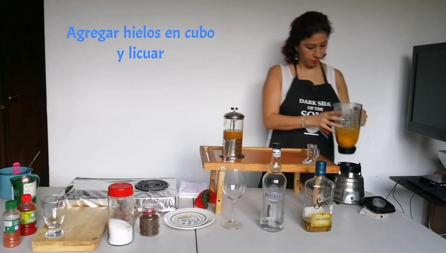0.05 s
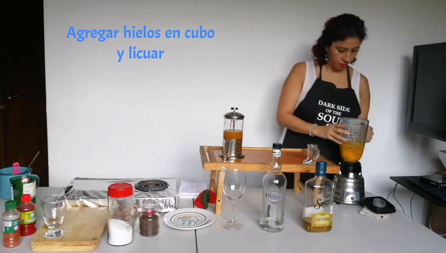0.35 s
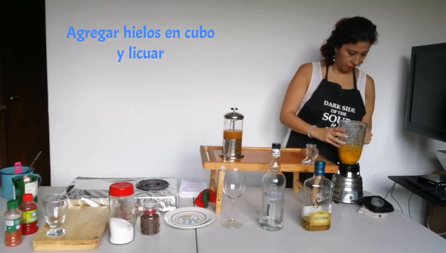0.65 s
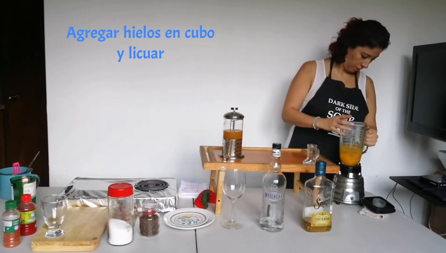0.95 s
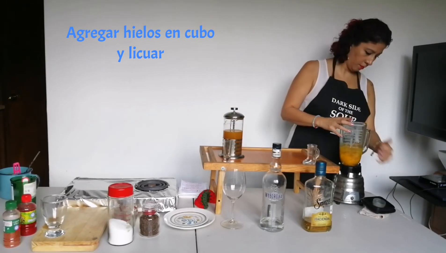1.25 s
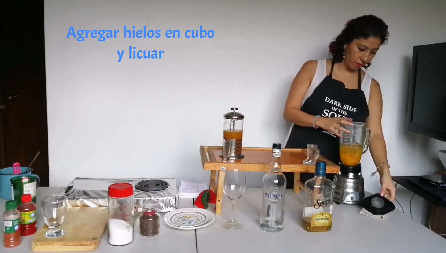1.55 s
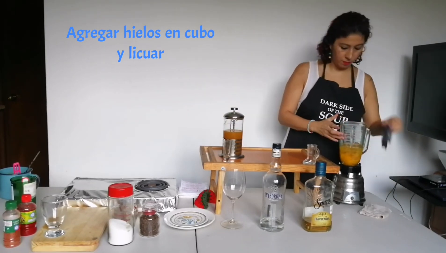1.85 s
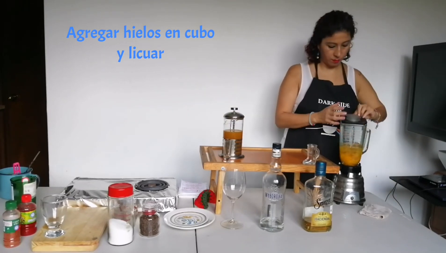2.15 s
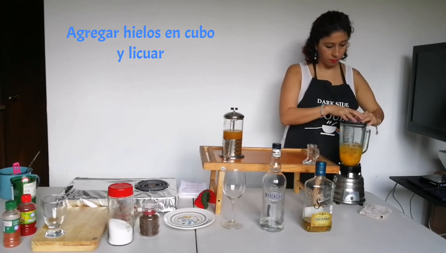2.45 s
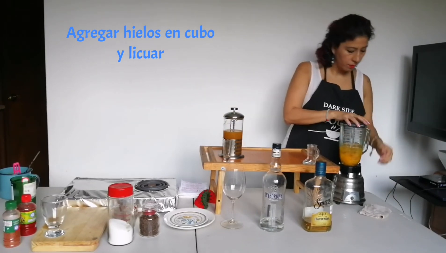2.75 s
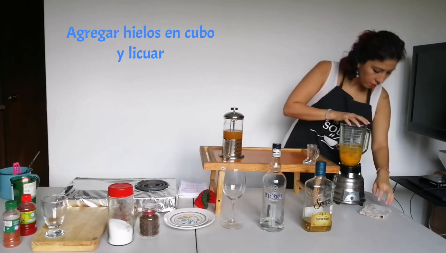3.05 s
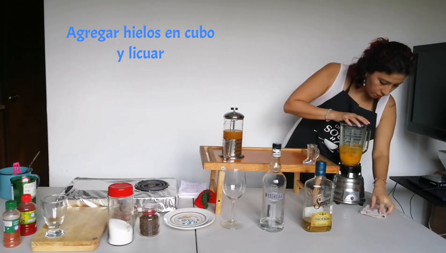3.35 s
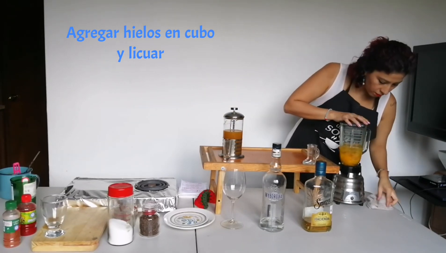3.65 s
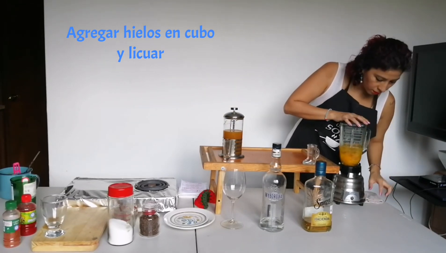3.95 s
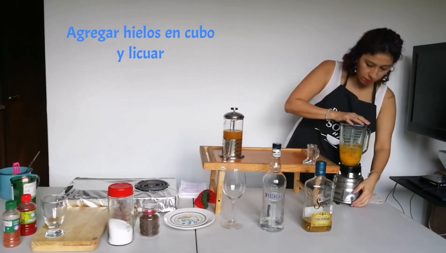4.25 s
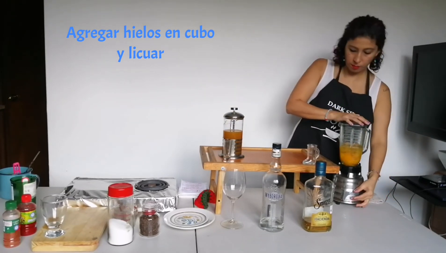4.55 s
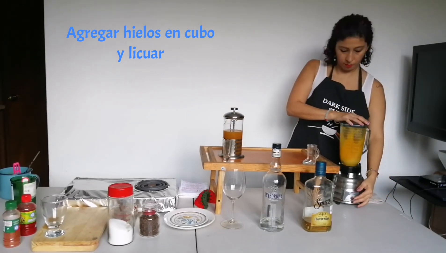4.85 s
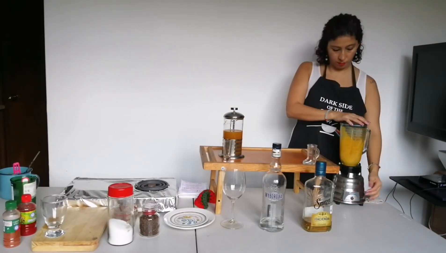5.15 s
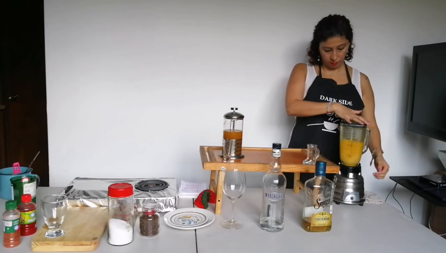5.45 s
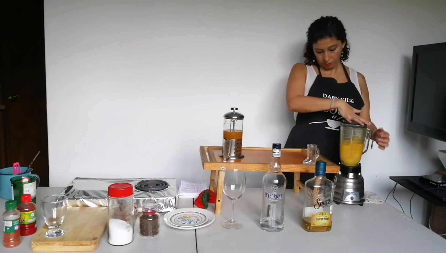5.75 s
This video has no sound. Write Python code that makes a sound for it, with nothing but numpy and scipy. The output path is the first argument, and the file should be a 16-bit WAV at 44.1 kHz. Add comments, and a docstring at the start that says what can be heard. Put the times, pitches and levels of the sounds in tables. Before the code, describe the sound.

In a small room with hard walls, a blender jar knocks onto its base and grinds twice as it is twisted home. A rubber lid is pressed on with quick thuds and a pop. A hand softly bumps the table and grips the base. The switch snaps, and the motor spins up, humming and whining while ice churns and rattles against the jar. The stereo sound has a short echo and a faint background hiss.

```python
"""You hear a blender jar of juice and ice knock and grind onto its base in a small hard-walled room.
Its rubber lid is pressed on, a hand bumps the table and grips the base, and the switch snaps.
The motor spins up, humming and whining, while the blades churn the ice and fling it at the jar.
Each knock is a thud of ringing tones plus a short scrape of noise. Before the motor starts,
faint rustles and a low drone swell and fade over a soft hiss and rumble."""
import sys
import numpy as np
from scipy import signal
from scipy.fft import rfft, irfft, next_fast_len
from scipy.io import wavfile
from scipy.ndimage import map_coordinates

SR = 44100
rng = np.random.default_rng(int(sys.argv[2]) if len(sys.argv) > 2 else 0)


def materialize(psi):
    """Save the field psi as 16-bit PCM at rate SR to the path in sys.argv[1].

    A 1-D psi becomes a single channel; in a 2-D psi each row is a channel.
    """
    bounded = np.clip(np.atleast_2d(psi).T, -1, 1)
    quanta = np.round(bounded * 32767).astype(np.int16)
    wavfile.write(sys.argv[1], SR, quanta)


N = 265103
TOP_HZ = 11750  # the highest pitch let through
MOTOR_ON_S, LOADED_HZ = 4.722, 243  # switch-on time; shaft turns a second against the ice

# The jar is twisted home. Each row: start in seconds, thud in dB, scrape in dB.
JAR_TWISTS = [(.65, -30, -34.5), (1.088, -34.5, -33)]
# Tones of the housing. Each row: pitch in Hz, level in dB, seconds to fade by 60 dB.
HOUSING_MODES = [(332, -11, 0.31), (395.4, -3.5, 0.15), (463, 5.5, 0.11), (555, 1, 0.075),
                 (659, -1.5, 0.12), (928, -12, 0.23)]
# Tone colour of blades in ice. Each row: frequency in Hz, noise level in dB.
CHURN_COLOUR = [(350, -33), (600, -11.5), (809, -6), (1000, -12.5), (1210, -5), (1490, -9), (1840, -6),
                (2330, -6), (2960, -4.5), (3400, -7), (3700, -12), (4300, -10.5), (5200, -1.5), (6100, 2),
                (7820, -13), (9910, -14.5), (10700, -20.5), (11800, -43)]
# Where the jar and metal shell ring. Each row: pitch in Hz, width in Hz, level in dB.
CASING_RESONANCES = [(1220, 30, -9), (1350, 30, -11), (1895, 40, -11), (2223, 60, -7), (2480, 50, -8),
                     (2724, 40, -9), (2950, 130, 1), (3240, 60, -8), (5432, 40, -3), (5865, 50, -2),
                     (6150, 50, 1), (6422, 35, 0)]


def amp(db):
    """Turn decibels into a gain."""
    return 10 ** (np.asarray(db) / 20)


def unit(x):
    """Scale a signal to an average power of 1."""
    return x / np.sqrt(np.mean(x ** 2) + 1e-20)


def along(points, hz):
    """Read between (Hz, value) points on a logarithmic frequency axis."""
    freqs, values = np.transpose(points)
    return np.interp(np.log(hz + 1), np.log(freqs + 1), values)


def curve(points):
    """Join (seconds, value) points into one value per sample."""
    return np.interp(np.arange(N) / SR, *np.transpose(points))


def since(s):
    """Seconds gone by since s, zero before it."""
    return np.maximum(np.arange(N) / SR - s, 0)


def ramp(s, rise_s):
    """Rise from 0 at time s to 1 over rise_s seconds."""
    return np.minimum(since(s) / rise_s, 1)


def wobble(rate, size=N):
    """A smooth curve through rate random values a second."""
    values = rng.standard_normal(int(size * rate / SR) + 4)
    return map_coordinates(values, [np.arange(size) * rate / SR])


def filtered(x, response):
    """Scale each frequency in x by response(hz)."""
    n = x.shape[-1]
    padded = next_fast_len(n + SR // 4)
    return irfft(rfft(x, padded) * response(np.fft.rfftfreq(padded, 1 / SR)), padded)[..., :n]


def resonances(table, hz):
    """How strongly a ringing body answers each frequency."""
    return sum(amp(db) * 1j * hz * width / (pitch ** 2 - hz ** 2 + 1j * hz * width)
               for pitch, width, db in table)


def spread(pair):
    """Mix two unrelated signals into sound from all around: the ears match only in the bass."""
    # Each row: frequency in Hz, likeness of left and right from 0 to 1.
    likeness = [(60, 0.9), (300, 0.92), (550, 0.61), (1000, 0), (4000, 0)]
    turn = lambda hz: np.arccos(np.clip(along(likeness, hz), -1, 1)) / 2
    mid, side = filtered(pair, lambda hz: np.array([np.cos(turn(hz)), np.sin(turn(hz))]))
    return np.array([mid + side, mid - side])


def noise(colour):
    """Stereo noise with the given tone colour and a power of 1."""
    return unit(filtered(spread(rng.standard_normal((2, N))), lambda hz: amp(along(colour, hz))))


def room(x, wet_db):
    """Hard walls add an echo at wet_db, in which each frequency dies at its own speed."""
    # Each row: frequency in Hz, seconds to fade by 60 dB.
    fade_times = [(150, 0.34), (400, 0.4), (1000, 0.37), (2800, 0.4), (7000, 0.28), (11000, 0.29)]
    hz, t, spectrum = signal.stft(rng.standard_normal((2, SR // 2)), SR, nperseg=256)
    fade = amp(-60 * t / along(fade_times, hz)[:, None])
    tail = spread(signal.istft(spectrum * fade, SR, nperseg=256)[1])
    tail = filtered(tail, lambda hz: hz < TOP_HZ)
    tail *= np.sqrt(2 * TOP_HZ / SR) / np.linalg.norm(tail[0])
    x = np.atleast_2d(x)
    return x + amp(wet_db) * signal.fftconvolve(x, tail, axes=1)[:, :x.shape[1]]


def contacts(rows, modes, colour, swell_s, sizzle_db, grain_db, wet_db, thud_wet_db, hard=(), hard_db=0):
    """Each knock thuds in a body's own tones (modes) and scrapes in tiny slips that ring hard parts."""
    size = SR * 3 // 4
    out, t = np.zeros((2, N + size)), np.arange(size) / SR
    sizzle = [(6800, 0), (8500, sizzle_db)]  # lifts or cuts the top treble
    swell = t / swell_s * np.exp(1 - t / swell_s)
    for start, thud_db, scrape_db in rows:
        ring = sum((-1) ** k * amp(db + rng.normal(0, 1) - 60 * t / fade_s)
                   * np.sin(2 * np.pi * hz * rng.normal(1, 0.0064) * t)
                   for k, (hz, db, fade_s) in enumerate(modes))
        thud = amp(thud_db) * ring * (1 - np.exp(-t / .0014)) / 2
        slips = spread(rng.standard_normal((2, size))) * amp(grain_db * wobble(705, size))
        slips = unit(filtered(slips, lambda hz: amp(along(colour, hz) + along(sizzle, hz))))
        scrape = amp(scrape_db) * slips * swell
        scrape = filtered(scrape, lambda hz: 1 + amp(hard_db) * resonances(hard, hz))
        out[:, round(start * SR):][:, :size] += room(thud, thud_wet_db) + room(scrape, wet_db)
    return out[:, :N]


def room_air():
    """The air hisses softly over a rumble that falls away once the motor runs."""
    # Each row: frequency in Hz, noise level in dB.
    air_colour = [(53, -40), (95, -16), (125, -17), (250, -10), (480, -16), (1200, -26), (3300, -30.5),
                  (3800, -38.5), (4500, -37), (5300, -31), (6400, -31), (7500, -39), (10500, -41),
                  (11700, -50)]
    rumble_colour = [(10, 1), (30, 4.5), (42, 1.5), (62, -2.5), (90, -5), (160, -18.5), (500, -131)]
    rumble = amp(-55.5 - 20.5 * ramp(MOTOR_ON_S, rise_s=0.26)) * noise(rumble_colour)
    return amp(-61) * noise(air_colour) + rumble


def drone():
    """A low tone glides upward in three swells."""
    # Each row: time in seconds, level in dB.
    swells = [(3.4, -70), (3.58, -58.5), (3.76, -51), (3.96, -59), (4.05, -49.5), (4.17, -56.5),
              (4.33, -48.5), (4.7, -58.5), (4.8, -100)]
    pitch_hz = 85 + 13.3 * since(swells[0][0])
    return np.sqrt(2) * amp(curve(swells)) * np.sin(2 * np.pi * np.cumsum(pitch_hz) / SR)


def rustle():
    """A soft, crinkly rustle swells with each reach of the arm."""
    # Each row: middle in seconds, length in seconds, level in dB.
    reaches = [(.42, .3, -66.5), (2.985, 0.39, -66.5), (3.907, 1.4, -66.5)]
    # Each row: frequency in Hz, noise level in dB.
    colour = [(200, -7), (700, 3), (1500, -1), (3200, -7.5), (4000, -10.5), (5800, -5.5), (8000, -20),
              (11500, -28)]
    t = np.arange(N) / SR
    level = sum(amp(db) * np.cos(np.pi * np.clip((t - middle) / length, -.5, .5))
                for middle, length, db in reaches)
    return level * unit(noise(colour) * amp(2.1 * wobble(18) + 2.3 * wobble(400)))


def faint_clicks():
    """Things click as they are picked up and put down."""
    # Each row: start in seconds, thud in dB, scrape in dB.
    clicks = [(1.569, -68, -72), (1.72, -66, -71), (1.92, -70, -70), (2.16, -65, -66), (3.436, -60, -58)]
    # Each row: frequency in Hz, scrape level in dB.
    colour = [(300, -16), (1500, -15), (2800, -13), (3400, 3), (4100, -12), (5800, -2), (11000, -26)]
    return contacts(clicks, HOUSING_MODES, colour, swell_s=.003,
                    sizzle_db=-3, grain_db=3, wet_db=2, thud_wet_db=0)


def table_shake():
    """The table gives a deep shudder after each twist of the jar."""
    # Each row: frequency in Hz, noise level in dB.
    colour = [(15, -8), (35, -1), (62, 12.5), (80, 4.5), (112, 4), (170, -33), (500, -100)]
    rise_s, fall_db_per_s = 0.029, 71
    level = sum(ramp(s, rise_s) * amp(-fall_db_per_s * since(s + rise_s)) for s, *_ in JAR_TWISTS)
    return amp(-39) * level * noise(colour)


def jar_on_base():
    """The jar knocks on the base and grinds in its metal collar as it is twisted home."""
    # Each row: start in seconds, thud in dB, scrape in dB.
    knocks = [(.485, -17, -42), (.516, -15.5, -46.5), (.589, -29.5, -41), (.618, -19, -36.5),
              (.641, -13, -33), (.697, -22, -40), (.825, -39, -71), (1.037, -36, -55.5),
              (1.059, -30.5, -36.5), (1.0695, -16, -31.5), (1.15, -29.5, -37), (1.2, -48, -35)]
    # The base on the table. Each row: pitch in Hz, level in dB, seconds to fade by 60 dB.
    base_modes = [(146.8, -8.5, 0.54), (176.1, -17, 0.63), (229.5, -5.5, 0.12), (269.8, 1, 0.31),
                  (313.4, -4, 0.25), (344.3, -12, 0.33), (403, -10, 0.22), (453, -2.5, 0.059),
                  (512.7, -12, 0.17)]
    # Each row: frequency in Hz, scrape level in dB.
    colour = [(60, 5.5), (150, 15), (400, 7), (600, 4.5), (1050, 1), (1500, -6.5), (2300, -8.5), (3200, -5),
              (3900, -15), (4700, -5.5), (6200, 0.5), (7400, -14), (9500, -10.5), (11500, -30.5)]
    # The collar's ringing. Each row: pitch in Hz, width in Hz, level in dB.
    collar = [(3192, 10, 12), (4587, 10, 20), (5615, 8, 12), (5825, 8, 18), (5927, 9, 10), (6190, 8, 15.5),
              (7095, 11, 20)]
    knocking = contacts(knocks, base_modes, colour, swell_s=0.0051, sizzle_db=-9,
                        grain_db=3.5, wet_db=6.5, thud_wet_db=-6, hard=collar, hard_db=-25)
    grinding = contacts(JAR_TWISTS, base_modes, colour, swell_s=0.026, sizzle_db=7.5,
                        grain_db=-2, wet_db=-1, thud_wet_db=10, hard=collar)
    return knocking + grinding


def lid():
    """The rubber lid is pressed on and pops past the rim; the deeper it sits, the lower it thuds."""
    # Each row: start in seconds, thud in dB, scrape in dB.
    presses = [(2.292, -38.5, -48.5), (2.325, -29.5, -40.5), (2.349, -61, -45), (2.417, -31.5, -54),
               (2.476, -32.5, -49), (2.531, -31, -48), (2.552, -36.5, -57), (2.601, -34, -61)]
    pop = [(2.5115, -35, -37)]
    # Each row: multiple of the thud's pitch, level in dB, seconds to fade by 60 dB.
    modes = [(0.563, -9.5, 0.25), (0.77, -16, 0.43), (1, 0.5, 0.15)]
    # Each row: frequency in Hz, scrape level in dB.
    press_colour = [(80, 6), (400, 18), (900, 0.5), (1750, -2.5), (2400, -8), (3400, -7), (3900, -10),
                    (4800, 3.5), (5500, 1), (6200, -2), (8000, -10.5), (10000, -17), (11500, -34)]
    pop_colour = [(300, -11), (500, 14), (750, -2), (2300, -11), (3500, -2.5), (3900, -2.5), (4800, 6),
                  (6300, 3.5), (7500, -3), (10000, -9.5), (11500, -30)]
    # The ringing of the jar's rim. Each row: pitch in Hz, width in Hz, level in dB.
    rim = [(1707, 32, 16), (3485, 40, 14.5), (4950, 36, 3), (6335, 50, 6), (7500, 50, 7)]

    def modes_at(s):
        pitch_hz = np.interp(s, [2.405, 2.5054], [520.2, 275])  # from loose to seated
        return [(multiple * pitch_hz, db, fade_s) for multiple, db, fade_s in modes]

    pressing = sum(contacts([row], modes_at(row[0]), press_colour, swell_s=0.0032, sizzle_db=1,
                            grain_db=7, wet_db=7.5, thud_wet_db=0.5, hard=rim) for row in presses)
    popping = contacts(pop, modes_at(pop[0][0]), pop_colour, swell_s=0.0023, sizzle_db=-2.5,
                       grain_db=-2, wet_db=5.5, thud_wet_db=6, hard=rim)
    return (pressing + popping) * amp([[1], [-1]])  # a little to the left


def hand():
    """A hand bumps the table softly, then takes hold of the base."""
    # Each row: start in seconds, thud in dB, scrape in dB.
    bumps = [(3.433, -39, -61), (3.464, -39, -64), (3.96, -47, -76), (4.03, -46, -65.5),
             (4.082, -50.5, -51.5)]
    grip = [(4.405, -38, -45), (4.428, -35.5, -51)]
    # Each row: pitch in Hz, level in dB, seconds to fade by 60 dB.
    table_modes = [(153, -10, 0.67), (191, -9.5, 0.3), (240.5, -2, 0.38), (270.5, 0.5, 0.46),
                   (323, -2.5, 0.15), (398, -10, 0.38)]
    # Each row: frequency in Hz, scrape level in dB.
    colour = [(80, -7), (400, 5), (900, 10.5), (1250, 4.5), (1600, -0.5), (2100, -8), (3400, -8.5),
              (4000, -17.5), (5800, -6.5), (8000, -34), (11500, -49)]
    bumping = contacts(bumps, table_modes, colour, swell_s=0.0065,
                       sizzle_db=14, grain_db=8.5, wet_db=11, thud_wet_db=1)
    gripping = contacts(grip, HOUSING_MODES, colour, swell_s=0.0071,
                        sizzle_db=14.5, grain_db=3, wet_db=4.5, thud_wet_db=1)
    return bumping + gripping


def switch():
    """A finger touches the switch, then it snaps shut with a bright click."""
    # Each row: start in seconds, thud in dB, scrape in dB.
    touch = [(4.51, -50, -53.5)]
    snaps = [(4.7222, -82, -19.5), (4.7275, -75, -24.5), (4.758, -51, -33)]
    # Each row: frequency in Hz, scrape level in dB.
    colour = [(290, -50), (500, -45), (1250, -16.5), (1480, -34), (2010, -6.5), (2350, -21.5), (3020, -3),
              (3940, -27), (4430, -4), (5410, 2.5), (6170, 4.5), (7630, -21), (9550, -24), (11800, -40.5)]
    touching = contacts(touch, HOUSING_MODES, colour, swell_s=0.0049,
                        sizzle_db=1, grain_db=-17, wet_db=10.5, thud_wet_db=0)
    snapping = contacts(snaps, HOUSING_MODES, colour, swell_s=0.003,
                        sizzle_db=9, grain_db=4, wet_db=-3, thud_wet_db=7.5)
    return touching + snapping


def ice_knocks():
    """The blades catch lumps of ice; one whole cube and some small pieces hit the jar wall."""
    # Each row: start in seconds, thud in dB, scrape in dB.
    lumps = [(4.782, -31, -40.5), (4.822, -27.5, -41), (4.87, -35, -53), (5.035, -45, -35),
             (5.13, -38.5, -36), (5.225, -40, -34), (5.855, -39, -30.5)]
    cube = [(4.962, -31.5, -29.5)]
    pieces = [(5.147, -38, -34), (5.213, -60, -30), (5.279, -49, -29.5), (5.740, -62, -36),
              (5.867, -60, -36), (5.950, -37, -34), (5.971, -44, -38.5)]
    # Each row: pitch in Hz, level in dB, seconds to fade by 60 dB.
    full_jar_modes = [(215, 1, 0.048), (287.6, -2.5, 0.24), (377, -4, 0.045)]
    wall_modes = [(646, -8, 0.13), (1359, 0, 0.2), (1723, -5, 0.09)]
    caught = contacts(lumps, full_jar_modes, CHURN_COLOUR, swell_s=0.0061,
                      sizzle_db=-7, grain_db=3.5, wet_db=6, thud_wet_db=4.5)
    flung = contacts(cube, wall_modes, CHURN_COLOUR, swell_s=0.0085,
                     sizzle_db=-13, grain_db=2, wet_db=-4.5, thud_wet_db=3.5)
    rattling = contacts(pieces, HOUSING_MODES, CHURN_COLOUR, swell_s=0.00097,
                        sizzle_db=-22, grain_db=8, wet_db=9, thud_wet_db=-11)
    return caught + flung + rattling


def shaft_speed():
    """Turns a second: the shaft spins up, gains speed as the mix loosens, then sags under fresh ice."""
    loose_hz, sag_hz_per_s = 271, 119
    spin_up = LOADED_HZ * np.tanh(since(MOTOR_ON_S) / .158)
    loosening = (loose_hz - LOADED_HZ) * (1 - np.exp(-since(5.39) / .1))
    return spin_up + loosening - sag_hz_per_s * since(5.92)


def shaft_tones(table, angle, flutter_db):
    """Tones at multiples of the shaft speed, each fluttering in level."""
    return sum(np.sqrt(2) * amp(db + flutter_db * wobble(25))
               * np.sin(multiple * angle + rng.uniform(0, 2 * np.pi)) for multiple, db in table)


def blade_beating(angle):
    """The blades beat the juice into a rough tone."""
    # Each row: multiple of the shaft speed, level in dB.
    tones = [(2, 10), (3, -23)]
    return unit(room(shaft_tones(tones, angle + .55 * wobble(70), flutter_db=2), wet_db=-2))


def motor_whine(angle):
    """The fan and the rotor's slots whine; each tone sings out as it passes a casing resonance."""
    # Each row: multiple of the shaft speed, level in dB.
    tones = [(5, -4), (6, 7), (7, 0.5), (8, 1), (10, 1), (11, 0.5), (12, 1.5)]
    whine = shaft_tones(tones, angle + 0.16 * wobble(140), flutter_db=3)
    return unit(room(filtered(whine, lambda hz: resonances(CASING_RESONANCES, hz)), wet_db=0))


def churning(angle):
    """The mix rushes in clumps and pulses with each turn; ice chips hit, the casing rings, juice slops."""
    # Each row: frequency in Hz, noise level in dB.
    slosh_colour = [(60, -18), (160, -11.5), (260, 9.5), (335, -2), (395, 7.5), (445, 1), (505, 8.5),
                    (580, -4), (750, -34), (2000, -59)]
    rush = unit(noise(CHURN_COLOUR) * (1 + 0.09 * np.sin(angle)) * amp(0.47 * wobble(300)))
    struck = rng.random(N) < 500 / SR  # about 500 chips a second
    hits = struck * rng.standard_normal(N) * amp(3.5 * rng.standard_normal(N))
    chips = unit(room(filtered(hits, lambda hz: amp(along(CHURN_COLOUR, hz))), wet_db=17.5))
    shell = filtered(unit(hits) + rng.standard_normal(N), lambda hz: resonances(CASING_RESONANCES, hz))
    shell = unit(room(shell, wet_db=27))
    slosh = noise(slosh_colour) * amp(2 * wobble(22))
    return amp(3) * rush + amp(5) * chips + amp(-11) * shell + amp(-6) * slosh


def blender():
    """The off-balance load hums, the motor whines and the blades churn, all louder as speed builds."""
    # Each row: time in seconds, level in dB once up to speed.
    hum_levels = [(4.956, -42), (5.052, -36), (5.216, -34), (5.352, -38.5), (5.39, -32.5), (5.456, -45),
                  (5.486, -35), (5.934, -26), (6.0, -37.5)]
    whine_levels = [(5.0, -49), (5.12, -47.5), (5.16, -52), (5.2, -47.5), (5.25, -54), (5.33, -54),
                    (5.365, -43), (5.44, -46), (5.52, -49), (5.71, -46.5), (5.8, -49), (5.87, -45),
                    (6.0, -46.5)]
    speed = shaft_speed()
    pace = np.minimum(speed / LOADED_HZ, 1)
    uneven_speed = speed * (1 + .003 * wobble(30) + .004 * wobble(250))  # ice brakes the blades
    angle = 2 * np.pi * np.cumsum(uneven_speed) / SR
    hum = np.sqrt(2) * pace ** 7 * amp(curve(hum_levels) + .4 * wobble(25)) * np.sin(angle)
    beating = amp(-12.5) * blade_beating(angle)
    whine = amp(curve(whine_levels)) * pace ** 6 * motor_whine(angle)
    fresh_ice_db = 5 * ramp(5.83, rise_s=0.053)  # more ice falls into the blades
    churn_gain = amp(-39.5 - 9.5 * (1 - pace ** 5.1) + fresh_ice_db)
    return ramp(MOTOR_ON_S, rise_s=0.027) * (hum + whine + churn_gain * (churning(angle) + beating))


def scene():
    """Everything that sounds in the room, in stereo."""
    knocks = jar_on_base() + lid() + hand() + switch() + ice_knocks() + faint_clicks()
    return knocks + rustle() + table_shake() + blender() + room_air() + drone()


def record(dry):
    """The two microphone openings colour the treble differently; nothing above TOP_HZ passes."""
    # Each row: frequency in Hz, left level minus right level in dB.
    balance = [(200, 2), (1000, 1.5), (3000, 3), (4500, 6), (6000, 14), (7300, 1), (9000, -6),
               (11000, -1.5)]

    def openings(hz):
        ratio = amp(along(balance, hz))
        return np.array([ratio, np.ones_like(hz)]) * np.sqrt(2 / (1 + ratio ** 2))
    return filtered(filtered(dry, openings), lambda hz: hz < TOP_HZ)


dry = scene()
out = record(dry)
materialize(out)
```